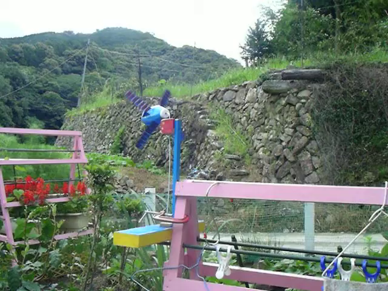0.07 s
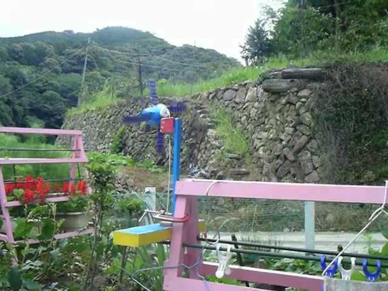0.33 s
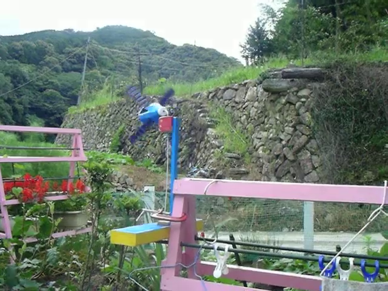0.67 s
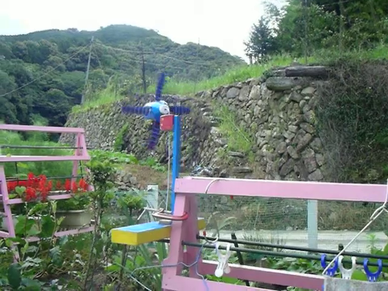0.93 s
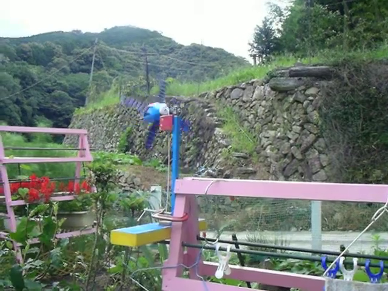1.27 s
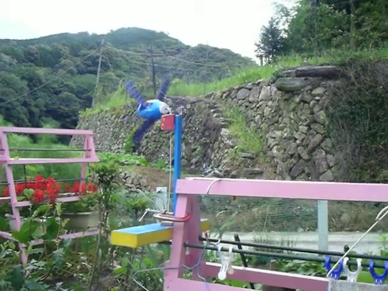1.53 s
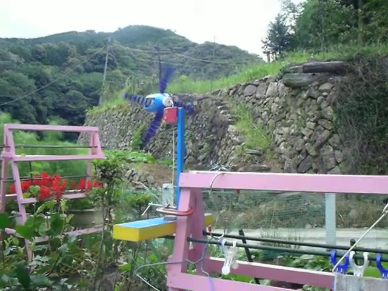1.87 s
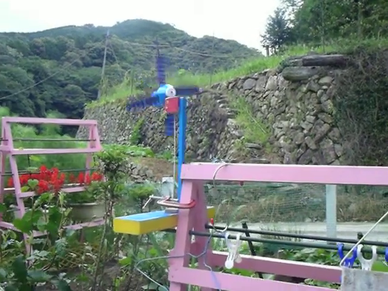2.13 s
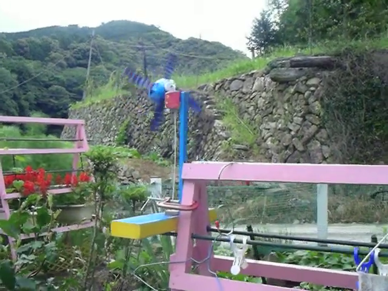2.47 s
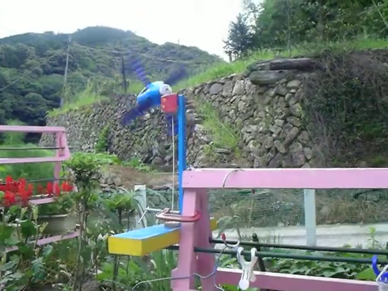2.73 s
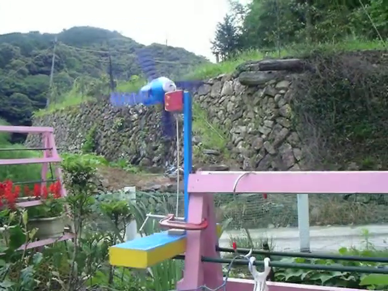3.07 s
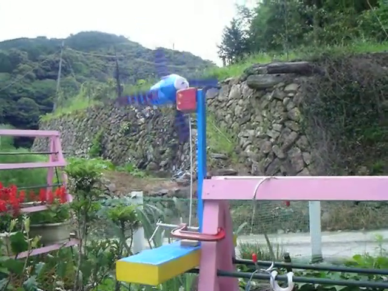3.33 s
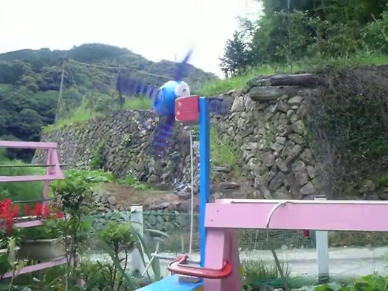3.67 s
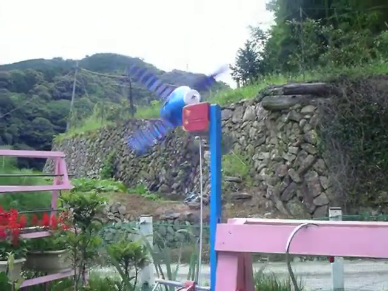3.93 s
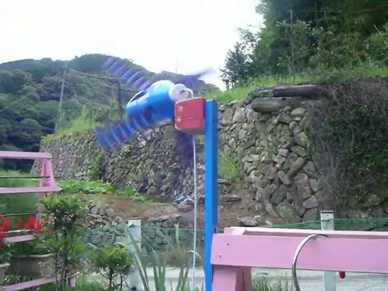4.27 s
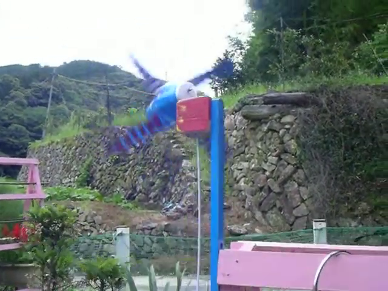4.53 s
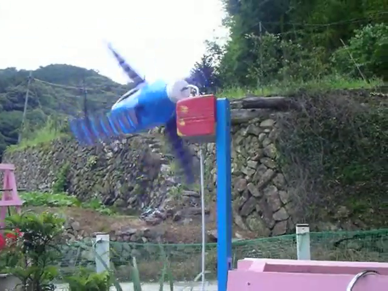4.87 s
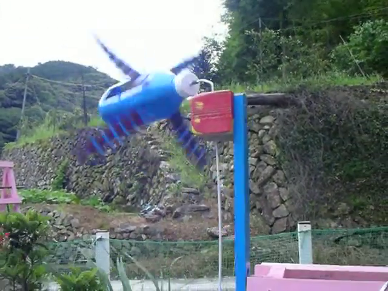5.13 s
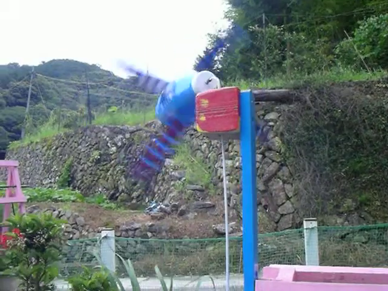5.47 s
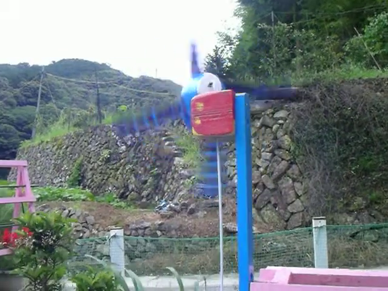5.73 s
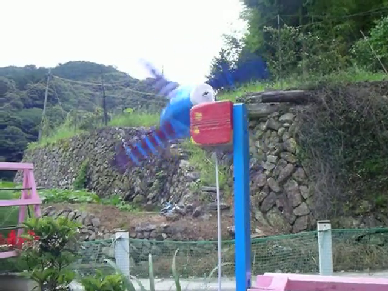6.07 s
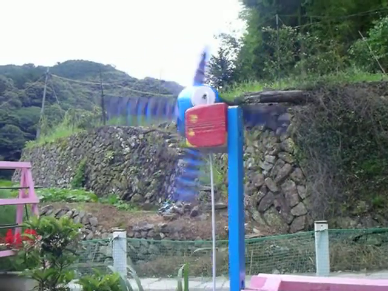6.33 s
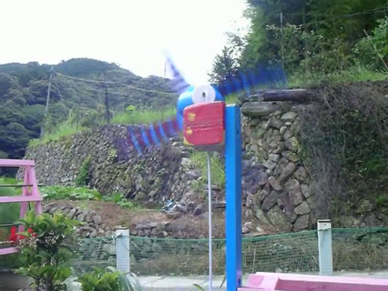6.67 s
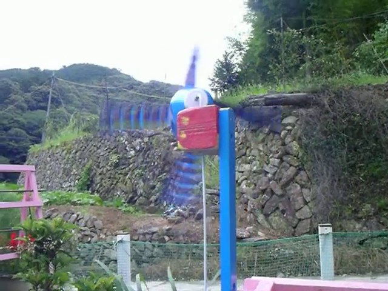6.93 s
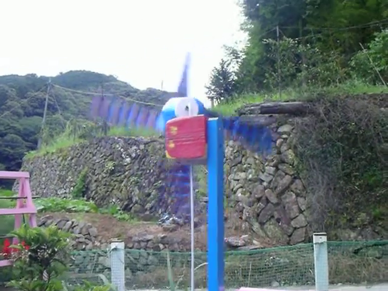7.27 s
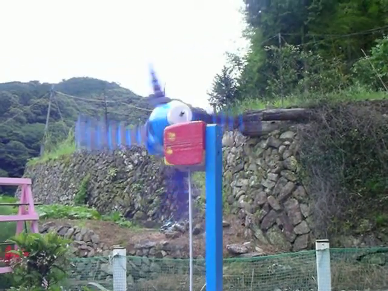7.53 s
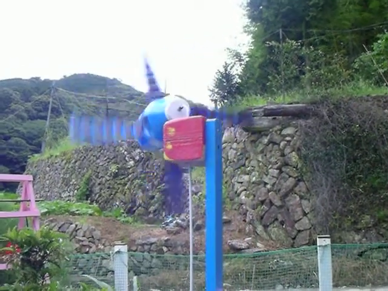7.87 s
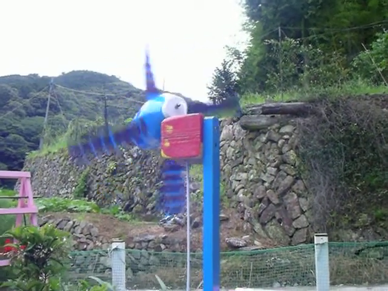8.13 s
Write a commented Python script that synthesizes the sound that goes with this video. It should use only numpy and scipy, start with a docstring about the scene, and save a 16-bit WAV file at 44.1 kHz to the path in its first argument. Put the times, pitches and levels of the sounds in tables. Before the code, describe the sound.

Outdoors, uneven gusts puff against a camera's microphone while a small plastic propeller clacks round on its shaft. Two quick handling clicks stand out near the start. The clacking quickens and a gritty whir joins it, with a burst of harder knocks just past the middle. A few very faint whistles, perhaps a distant bird, sit in the light hiss, and everything sounds slightly muffled.

```python
"""You hear a toy wind vane knocking and whirring in a garden, with gusts thumping over it.
Its plastic propeller knocks twice a turn in a loose bearing and whirs as it speeds up.
The gusts hit a camera's microphone as trains of eddies, which are small swirls of air.
A finger clicks on the camera's case, and thin whistles sound far off. The camera pops as it
switches on, hisses, loses the high treble and flattens the loudest peaks."""
import sys
import numpy as np
from scipy import signal
from scipy.fft import rfft, irfft, next_fast_len
from scipy.io import wavfile
from scipy.ndimage import map_coordinates

SR = 44100
rng = np.random.default_rng(int(sys.argv[2]) if len(sys.argv) > 2 else 0)


def store_wav(level_fs):
    """Save 16-bit WAV to argv[1]."""
    pcm = np.round(np.clip(np.atleast_2d(level_fs), -1, 1) * 32767)
    wavfile.write(sys.argv[1], SR, pcm.T.astype(np.int16))


N = 370881

# Levels in the tables are relative: the functions add their own gains.
# how fast the propeller spins: time_s, turns_per_s
SPIN_SPEED = [(0.0, 3.14), (0.6, 4.53), (1.3, 5.11), (2.2, 5.23), (2.8, 6.33), (3.4, 8.65), (4.2, 10.22),
              (5.0, 10.49), (5.6, 9.1), (6.4, 8.38), (7.1, 10.1), (7.7, 9.55), (8.41, 8.34)]
# how hard the shaft knocks: time_s, level_db
KNOCK_STRENGTH = [(0.2, -27.5), (0.36, -32), (1.28, -27.5), (2, -40), (2.9, -37.5), (3.5, -28.5),
                  (4.3, -26), (4.5, -31.5), (4.9, -26.5), (5.25, -39), (6.3, -33.5), (7.2, -28),
                  (8.35, -20.5)]
# jolts of the shaft as the vane swings: start_s, ring_db, tick_db
SHAFT_JOLTS = [(0.439, -29, -50), (0.586, -27.5, -52), (3.581, -25.5, -37), (3.999, -22.5, -47.5),
               (4.142, -23, -35.5), (4.557, -29.5, -44), (4.724, -28, -35), (4.787, -22, -41),
               (4.817, -26.5, -26), (4.9, -23, -23.5), (4.915, -22, -22), (5.011, -19.5, -15.5),
               (5.08, -22, -21.5), (7.081, -22.5, -34), (7.179, -23, -50), (7.253, -26, -36),
               (7.724, -25.5, -49)]
# how loudly the shaft rattles in its bearing: time_s, level_db
CHATTER_LEVEL = [(0, -61), (2.3, -63), (3.05, -46.5), (3.35, -36.5), (3.78, -37.5), (3.97, -46.5),
                 (4.01, -36), (4.44, -33), (4.48, -58.5), (4.55, -56), (4.565, -39), (5.05, -33),
                 (5.16, -38.5), (5.21, -53.5), (5.6, -45.5), (6.3, -46.5), (7.1, -40), (8.4, -40)]
# the tones the vane's plastic housing rings at: pitch_hz, width_hz, level_db
HOUSING_TONES = [(740.6, 104, 3), (862, 134, 1.5), (1183, 140, 1.5), (1314, 215, -2), (1580, 130, -6),
                 (2010, 240, -9), (2400, 380, -10), (2765, 400, -10.5), (2954, 560, -15), (3610, 550, -17),
                 (3930, 1400, -25.5)]
# gusts on the microphone: start_s, length_s, level_db, fade_db, pitch_hz
WIND_GUSTS = [(0.113, 0.079, -21, 8, 157), (1.338, 0.11, -25.5, 8, 130), (1.612, 0.079, -20.5, 4, 261),
              (1.723, 0.11, -20, 11, 200), (2.726, 0.12, -26.5, -1.5, 230), (2.875, 0.14, -29, 4, 227),
              (3.013, 0.077, -22.5, 1, 275), (4.333, 0.17, -30.5, 1, 121), (5.06, 0.14, -25.5, -1, 240),
              (5.228, 0.15, -32.5, -0.5, 320), (5.462, 0.18, -19, 14, 430), (5.743, 0.078, -19, 8.5, 450),
              (5.915, 0.19, -31, 4.5, 320), (6.795, 0.05, -31.5, -3, 240), (7.068, 0.11, -30.5, -1.5, 221),
              (7.326, 0.08, -23, -1, 290), (7.718, 0.12, -23, 7, 248), (7.91, 0.15, -33, 4, 175),
              (8.278, 0.042, -23.5, -1.5, 185)]
# single hard puffs of air: start_s, length_s, level_db, pitch_hz
AIR_PUFFS = [(0.076, 0.012, -16, 263), (0.3, 0.012, -23, 280), (1.406, 0.011, -16.5, 177),
             (1.737, 0.0075, -14.5, 210), (1.776, 0.008, -19, 340), (1.933, 0.0065, -14, 240),
             (1.941, 0.011, -11.5, 430), (1.981, 0.011, -27, 278), (2.057, 0.018, -26, 210),
             (2.081, 0.0074, -25.5, 380), (2.652, 0.028, -31, 159), (2.788, 0.0081, -22.5, 380),
             (3.425, 0.0088, -21, 270), (3.875, 0.016, -18.5, 200), (4.366, 0.012, -20, 172),
             (4.444, 0.0057, -3.5, 199), (4.447, 0.0094, -11.5, 530), (4.458, 0.011, -21.5, 420),
             (5.025, 0.031, -17.5, 240), (5.125, 0.019, -17, 244), (5.149, 0.0079, -7.5, 303),
             (5.278, 0.0091, -18, 480), (5.443, 0.016, -13, 450), (5.472, 0.0088, -17, 577),
             (5.498, 0.006, -20, 557), (5.576, 0.0045, -28, 600), (5.69, 0.0095, -23, 309),
             (5.783, 0.0095, -14.5, 720), (5.918, 0.015, -24.5, 324), (6.457, 0.01, -29.5, 400),
             (7.387, 0.0095, -18.5, 310), (7.655, 0.0086, -18.5, 255)]
# soft thuds of slow eddies: start_s, level_db
SLOW_EDDIES = [(0.707, -26.5), (0.807, -27), (0.932, -33), (1.145, -27.5), (2.238, -27.5), (4.945, -25),
               (6.692, -26.5), (6.77, -26)]
# the rumble between gusts: time_s, level_db
BREEZE_LEVEL = [(0.07, -37), (0.5, -49.5), (1.2, -54), (1.38, -35), (1.92, -30), (2.04, -41), (2.42, -58.5),
                (2.78, -36.5), (3.06, -36), (3.17, -50.5), (3.8, -36.5), (4.42, -34), (4.7, -41),
                (5.15, -36.5), (5.6, -41.5), (6.25, -59.5), (6.8, -37), (8.4, -38.5)]
# that rumble from bass to treble: frequency_hz, level_db
BREEZE_COLOUR = [(20, -23), (50, -5), (100, 1), (200, -3.5), (350, -13), (600, -14.5), (1200, -50.5),
                 (3000, -69.5)]
# finger clicks on the camera's case: time_s, level_db, pitch_hz, rise_s, fade_60_db_s
FINGER_CLICKS = [(1.2462, 0.5, 2600, 0.00021, 0.014), (1.4776, -1, 3257, 0.00051, 0.014),
                 (1.4801, 0.5, 3150, 0.00078, 0.013)]
# the tones the case rings at: pitch_multiple, level_db
CASE_TONES = [(.2, -18), (.31, -14), (.42, -14), (.56, -14), (.69, -8), (.84, -13), (.95, -3), (1.07, -4),
              (1.17, -9.5)]
# far whistles: start_s, length_s, start_hz, end_hz, level_db
FAR_WHISTLES = [(1.764, .05, 3050, 2780, -55), (2.73, .045, 3330, 3290, -61),
                (2.795, 0.078, 3240, 3220, -58), (3.05, 0.1, 3570, 3530, -58),
                (3.189, 0.11, 3590, 3470, -58), (3.67, 0.08, 3150, 3250, -52.5),
                (4.048, 0.1, 3300, 3360, -53), (4.29, 0.079, 3410, 3400, -54)]
# how loud the hiss is: time_s, level_db
HISS_LOUDNESS = [(0, -45.5), (1.45, -44.5), (1.52, -48.5), (1.93, -45.5), (1.99, -54.5), (2.7, -50.5),
                 (4.4, -47), (4.5, -52), (5.1, -55.5), (5.25, -52.5), (6.2, -53), (8.4, -53)]
# the hiss from bass to treble: frequency_hz, level_db
HISS_COLOUR = [(150, -17.5), (250, -3.5), (507, -1), (670, -2.5), (710, 1), (1020, -2), (1970, -5.5),
               (3520, -8.5), (4000, -12.5), (5200, -47.5), (8800, -120)]

START_TURNS, STRIKE_TURNS = -.247, (0, .35)  # angles where the propeller starts and the shaft strikes


def knocks(level_db=26, scatter_db=2, scrape_fade_s=.067, soft_hz=2600, tick_hz=2600):
    """The shaft hits its bearing twice a turn: a blow, a scrape and a tick. Jolts add extra hits."""
    force, ticks, t = np.zeros(N), np.zeros(N), np.arange(SR // 10) / SR
    turns, strength_db = shaft_turns(), curve(KNOCK_STRENGTH)
    tick_fade = np.exp(-t / .0042)

    def strike():
        scrape = .13 * rng.standard_normal(len(t)) * amp(-60 * t / scrape_fade_s)
        return 2 * (t == 0) + scrape

    for angle in STRIKE_TURNS:
        for i in np.flatnonzero(np.diff(np.floor(turns - angle))):  # each pass of this angle
            blow = strike() * amp(strength_db[i] + scatter_db * rng.standard_normal())
            add(force, i / SR + .001007, blow * amp(level_db))
            add(ticks, i / SR + .001, blow * tick_fade * amp(-3))
    for start, ring_db, tick_db in SHAFT_JOLTS:
        blow = strike()
        add(force, start + .000997, blow * amp(ring_db + level_db))
        add(ticks, start + .001, blow * tick_fade * amp(tick_db + 20))
    soft_force = filtered(force, lambda hz: 1 / (1 + 1j * hz / soft_hz))
    bright_ticks = filtered(ticks, lambda hz: (hz / np.hypot(hz, tick_hz)) ** 4)
    return housing(soft_force) + bright_ticks


def chatter(ticks_per_turn=7, grains_per_s=3000, swing_db=2, lag_turns=.06):
    """The whir: the hub ticks and rubs as it spins, and the shaft presses harder twice a turn."""
    turns = shaft_turns()
    tick_count = ticks_per_turn * turns + .15 * wobble(60)
    is_tick = np.diff(np.floor(tick_count), prepend=tick_count[0] // 1) > 0
    ticks = is_tick * amp(19 + 3 * np.clip(rng.standard_normal(N), -2, 1.5))
    grit = unit((rng.random(N) < grains_per_s / SR) * rng.standard_normal(N))
    rub = 1.1 * grit * np.exp(-1.2 * (tick_count % 1))  # eases off after each tick
    pressure = amp(swing_db * np.cos(4 * np.pi * (turns - lag_turns) + .5 * wobble(14)))
    return unit(housing((ticks + rub) * pressure)) * amp(curve(CHATTER_LEVEL))


def housing(force, vary_db=2.5, low_hz=520):
    """Hits make the housing ring. The contact point moves, so each tone's share keeps changing."""
    ring = np.zeros(N)
    for k, (pitch, width, db) in enumerate(HOUSING_TONES):
        push = force * amp(db + vary_db * wobble(70))
        ring += (-1) ** k * filtered(push, lambda hz: resonance(hz, pitch, width))
    # so small a body gives off little bass
    return signal.sosfilt(signal.butter(2, low_hz, "high", fs=SR, output="sos"), ring)


def shaft_turns():
    """The propeller's speed adds up to its angle, in turns."""
    return START_TURNS + np.cumsum(curve(SPIN_SPEED)) / SR


def wind(limit=.65):
    """Air pushes on the microphone, and the strongest pushes overload it."""
    pressure = puffs() + thuds() + breeze()
    return pressure / (1 + (pressure / limit) ** 6) ** (1 / 6)


def puffs(level_db=-1, swirl_slope=3.54, peak_slope=3.07, lumpy_db=2):
    """Each eddy hits the microphone as a dull swirl around a sharper peak. Faster ones are brighter."""
    out, lumps = np.zeros(N), amp(lumpy_db * wobble(170))
    air = rng.standard_normal(N)
    for start, length, db, pitch in list(AIR_PUFFS) + gust_eddies():
        def colour(hz, slope):
            bass_cut = (hz / np.hypot(hz, .27 * pitch)) ** 2
            return bass_cut / np.sqrt(1 + (hz / (1.34 * pitch)) ** (2 * slope))

        n = int(np.clip(1.6 * length * SR, 64, SR // 4))
        here = min(round(start * SR), N - n) + np.arange(n)
        swirl = filtered(air[here], lambda hz: colour(hz, swirl_slope))
        spike = 13 * np.sign(swirl[n // 2]) * signal.unit_impulse(n, "mid")
        peak = filtered(spike, lambda hz: colour(hz, peak_slope))
        eddy = (swirl + peak) * signal.windows.tukey(n, .7) * lumps[here]
        add(out, start + length / 2 - n / SR / 2, unit(eddy) * amp(db + level_db))
    return out


def gust_eddies(gap_s=.022, eddy_s=.014, scatter_db=1.5, max_eddies=14):
    """Each gust breaks into an uneven train of eddies that fades or swells. Rows match AIR_PUFFS."""
    rows = []
    for start, length, db, fade_db, pitch in WIND_GUSTS:
        for k, (shift, size, tone) in enumerate(rng.standard_normal((max_eddies, 3))):
            age = k * gap_s
            if age + gap_s / 2 < length:
                eddy_start = start + age + .2 * gap_s * shift
                eddy_db = db - fade_db * age / length + scatter_db * size
                rows.append((eddy_start, eddy_s, eddy_db, pitch * amp(1.22 * tone)))
    return rows


def thuds(typical_hz=125, width_s=.00557, level_db=-2):
    """A slow eddy gives one rounded swing of air pressure."""
    out, t = np.zeros(N), np.arange(-SR // 50, SR // 50) / SR
    shape = np.exp(-(t / width_s) ** 2)
    for start, db in SLOW_EDDIES:
        tone, phase = rng.standard_normal(2)
        pitch = typical_hz * amp(2 * tone)
        swing = np.sin(2 * np.pi * pitch * t + np.pi * phase) * shape
        add(out, start + t[0] + width_s, amp(db + level_db) * swing)
    return out


def breeze(level_db=-1, lumpy_db=6):
    """Weaker swirls of air keep rumbling between the puffs."""
    rumble = noise(BREEZE_COLOUR) * amp(lumpy_db * wobble(45))
    return unit(rumble) * amp(curve(BREEZE_LEVEL) + level_db)


def clicks(tail_fade_s=.048, limit=.76):
    """A finger snaps on the camera's case: a few very short tones, a crack and a faint tail."""
    out, t = np.zeros(N), np.arange(-SR // 100, SR // 25) / SR
    for time, db, pitch, rise, fade in FINGER_CLICKS:
        shape = np.exp(np.minimum(t, 0) / rise) * amp(-60 * np.maximum(t, 0) / fade)
        ring = sum(amp(level) * np.sin(2 * np.pi * ratio * pitch * t) for ratio, level in CASE_TONES)
        tail = (t > 0) * amp(-26 - 60 * np.abs(t) / tail_fade_s)
        crack = 2 * (amp(-13) * shape + tail) * rng.standard_normal(len(t))
        snap = amp(db) * (shape * ring + crack)
        add(out, time + t[0], limit * np.tanh(snap / limit))
    return out


def whistles(waver_hz=32):
    """Thin, unsteady whistles, perhaps from a distant bird."""
    out, waver = np.zeros(N), waver_hz * wobble(200)
    for start, length, start_hz, end_hz, db in FAR_WHISTLES:
        n = int(length * SR)
        pitch = np.linspace(start_hz, end_hz, n) + waver[round(start * SR):][:n]
        tone = np.sin(2 * np.pi * np.cumsum(pitch) / SR)
        add(out, start, amp(db) * unit(np.hanning(n) ** .5 * tone))
    return out


def hiss():
    """The camera's own hiss, which dips at set times just after loud moments."""
    return noise(HISS_COLOUR) * amp(curve(HISS_LOUDNESS))


def amp(db):
    """Turn decibels into a number to multiply by."""
    return 10 ** (np.asarray(db) / 20)


def unit(x):
    """Scale a sound to an average strength (rms) of 1."""
    return x / np.sqrt(np.mean(x ** 2) + 1e-20)


def curve(rows):
    """Join (time_s, value) points with straight lines, one value per sample."""
    return np.interp(np.arange(N) / SR, *np.transpose(rows))


def wobble(points_per_s):
    """A smooth curve through random points."""
    points = rng.standard_normal(int(N * points_per_s / SR) + 4)
    return map_coordinates(points, [np.arange(N) * points_per_s / SR])


def filtered(x, response):
    """Turn each frequency in a sound up or down by response(hz)."""
    size = next_fast_len(len(x) + 4096)
    return irfft(rfft(x, size) * response(np.fft.rfftfreq(size, 1 / SR)), size)[:len(x)]


def noise(colour):
    """Noise of strength 1, shaped by (frequency_hz, level_db) rows."""
    freqs, db = np.transpose(colour)
    white = rng.standard_normal(N)
    return unit(filtered(white, lambda hz: amp(np.interp(np.log(hz + 1), np.log(freqs), db))))


def resonance(hz, pitch, width):
    """How one ringing tone responds to a push at each frequency."""
    return 1j * hz * width / (pitch ** 2 - hz ** 2 + 1j * hz * width)


def add(track, start_s, sound):
    """Mix a sound into the track at start_s."""
    part = track[max(round(start_s * SR), 0):][:len(sound)]
    part += sound[:len(part)]


def scene():
    """Over the hiss go the vane, wind, clicks and whistles, all in one channel."""
    return (hiss() + chatter() + knocks() + wind() + clicks() + whistles())[None]


def record(dry, switch_on_s=.0724, pop_decay_s=.00016, offset=-.059, limit=.71, top_hz=16000):
    """The camera pops on, cuts the high treble, sits a little off zero and flattens loud peaks."""
    running_s = np.maximum(np.arange(N) / SR - switch_on_s, 0)
    is_on = running_s > 0
    treble_cut = lambda hz: amp(np.interp(hz, [3750, 4000, 4250, 4450, 4700], [0, -3, -13, -36, -120]))
    muffled = filtered(dry[0] * is_on, treble_cut)
    pop = .72 * is_on * np.exp(-running_s / pop_decay_s)
    off_zero = offset * (1 - np.exp(-running_s / .01))
    flattened = np.clip(muffled + pop + off_zero, -limit, limit)
    return filtered(flattened, lambda hz: 1 / np.sqrt(1 + (hz / top_hz) ** 48))[None]


dry = scene()
out = record(dry)
store_wav(out)
```